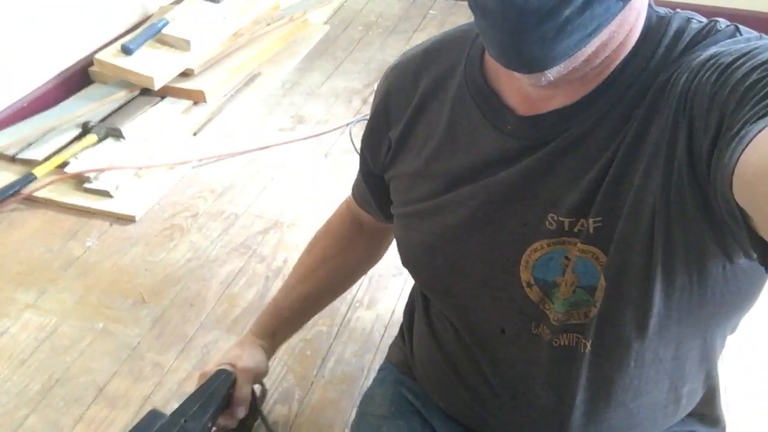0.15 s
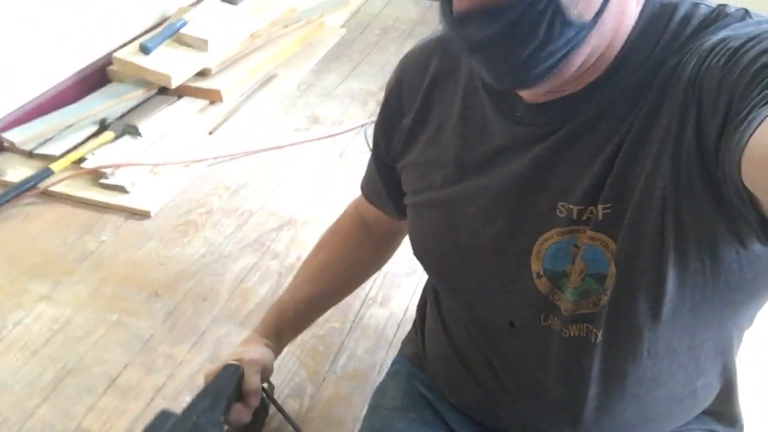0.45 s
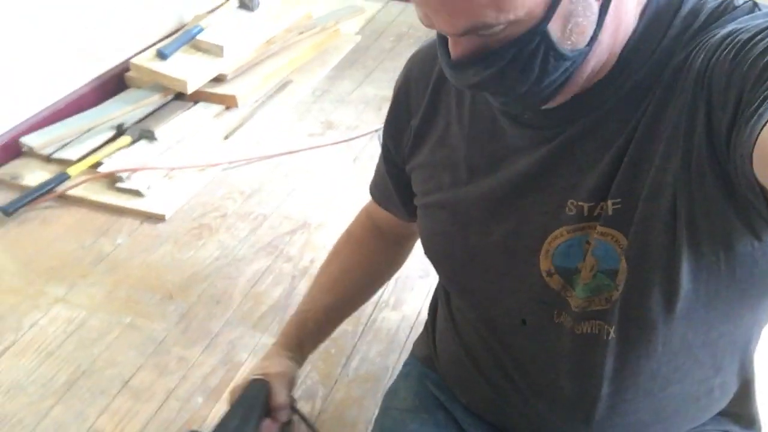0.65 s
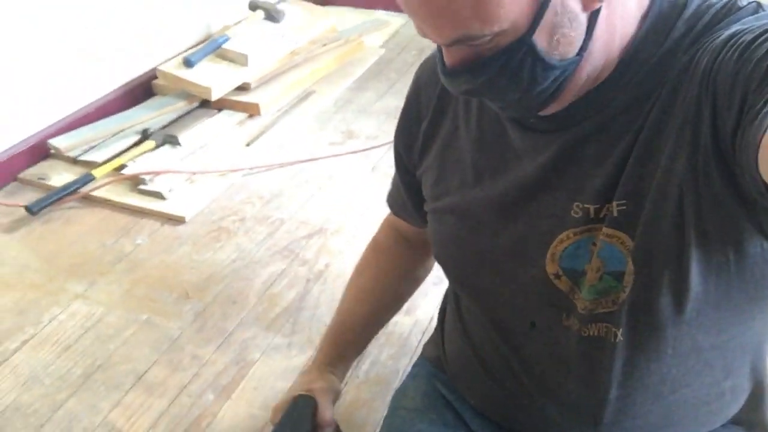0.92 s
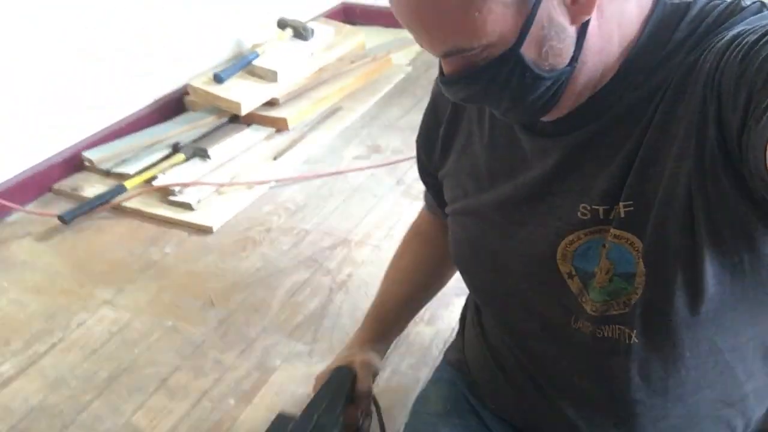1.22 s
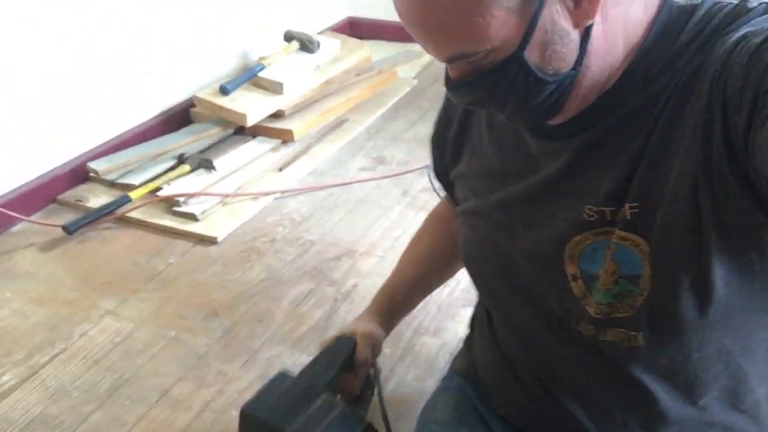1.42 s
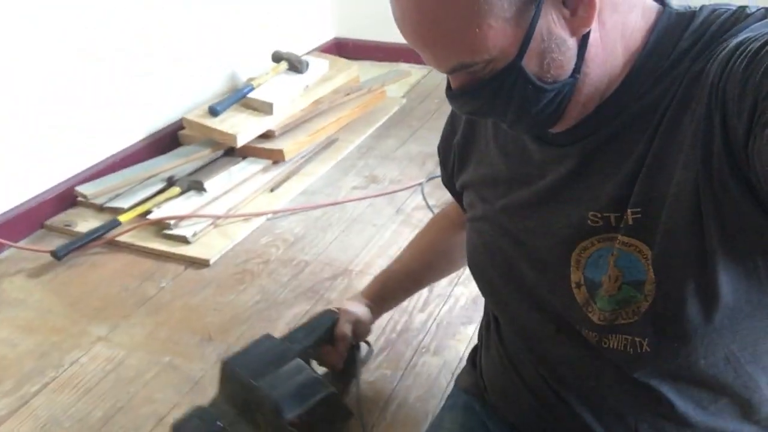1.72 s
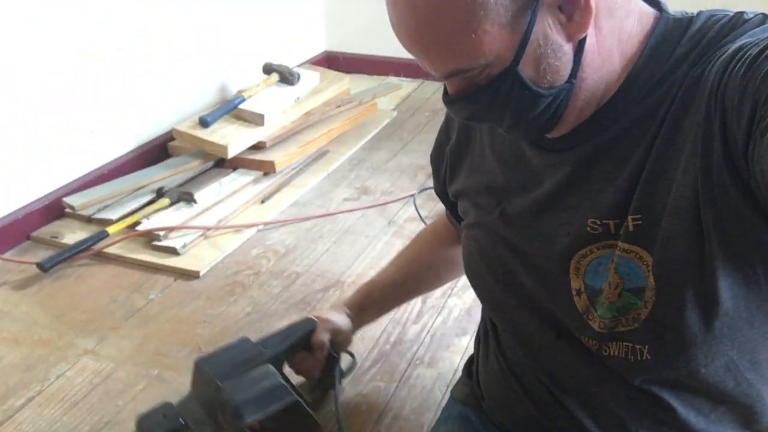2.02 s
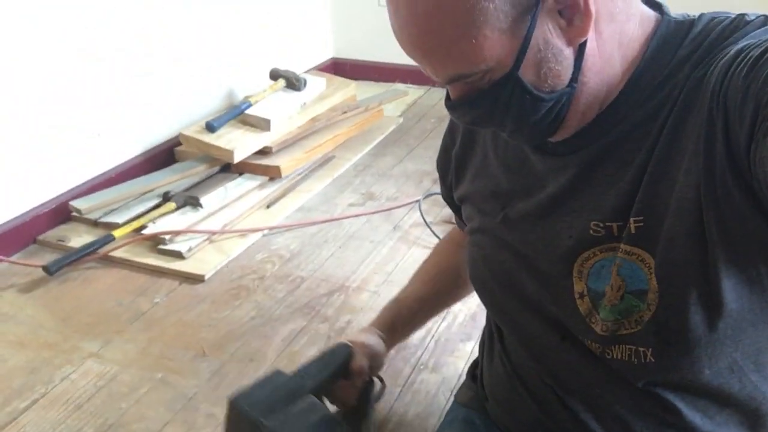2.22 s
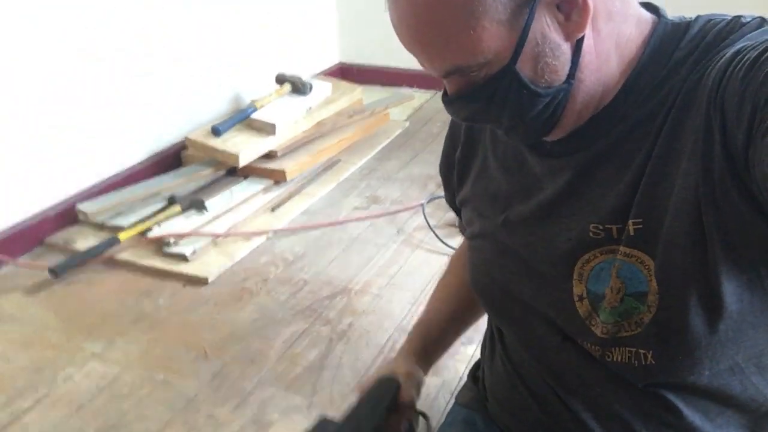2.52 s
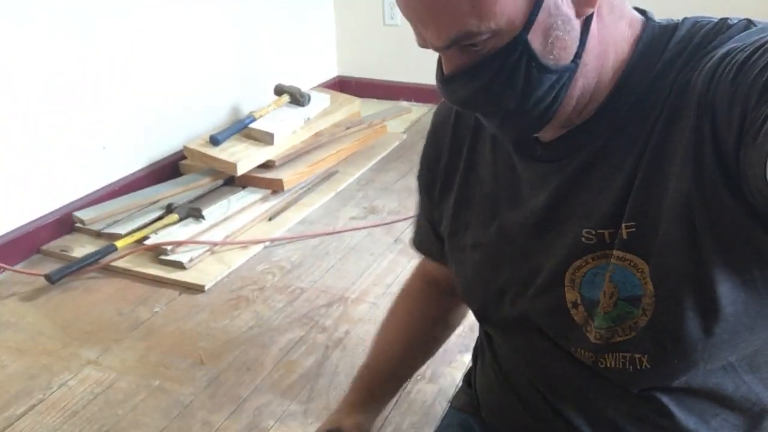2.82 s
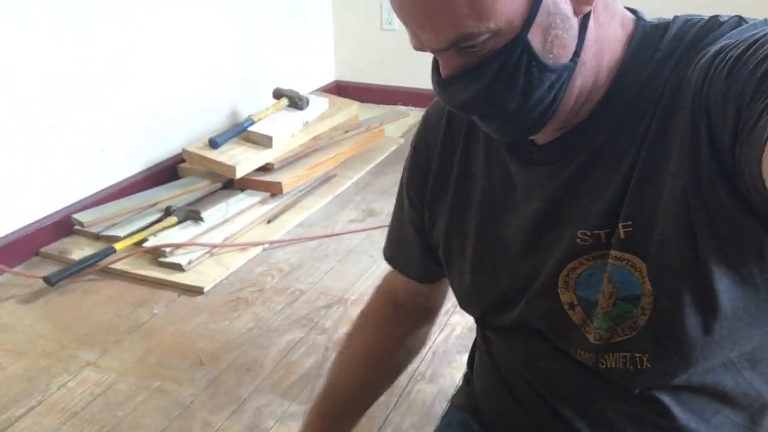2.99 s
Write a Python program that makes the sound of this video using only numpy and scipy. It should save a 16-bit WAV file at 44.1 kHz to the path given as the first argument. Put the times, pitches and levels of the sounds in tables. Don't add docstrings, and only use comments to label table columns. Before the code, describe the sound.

A handheld electric belt sander clicks on and spins up to a steady, high whine indoors.

```python
import sys
import numpy as np
from scipy import signal
from scipy.fft import rfft, irfft, next_fast_len
from scipy.io import wavfile
from scipy.ndimage import uniform_filter1d, map_coordinates

SR = 44100
rng = np.random.default_rng(int(sys.argv[2]) if len(sys.argv) > 2 else 0)


def output_pcm(signal):
    pcm = np.clip(np.atleast_2d(signal).T, -1, 1) * 32767
    wavfile.write(sys.argv[1], SR, np.round(pcm).astype(np.int16))


def gain_from_decibels(decibels):
    exponent = np.asarray(decibels, float) / 20
    return 10 ** exponent


N = 138915

# f/Hz, density/dB per Hz
QUIET = [(15, -44), (25, -9), (65, 4), (249, 11), (377, -5), (475, -34), (1730, -13), (12000, -23),
         (15600, -72), (22000, -120)]
QUIET_DB = -58
# f/Hz, density/dB per Hz
GRIP = [(200, -7), (600, -8), (1300, -4), (3000, -14), (6000, -30), (12000, -42)]
# t/s, level/dB
HAND = [
    (0, -53),
    (.05, -56.5),
    (.11, -57),
    (.13, -49.5),
    (.18, -44),
    (.21, -43.5),
]
ROOM_T60_S, ROOM_DB, ROOM_DULL_HZ = 0.57, -10, 5400

# f/Hz, density/dB per Hz
RUMBLE = [(20, -9), (32, 6), (48, -19), (65, 6), (90, 2), (110, -33), (200, -60)]
RUMBLE_DB, RUMBLE_FOLLOWS = -53.5, 0.44

# t/s, peak level/dB, t60/s
CLICKS = [
    (.124, -44, .004),
    (.2085, -31, .007),
    (.212, -31, .007),
    (.2214, -16, .012),
    (.2274, -10, .01),
]
CLICK_LOW_HZ, CLICK_HIGH_HZ = 2000, 7000
# f/Hz, level/dB, t60/s
JERK = [(500, -3, .3), (960, -5, .45), (1390, 0, .12), (1850, -2, .1)]
JERK_S, JERK_DB = .221, -21
ON_S, ON_RISE_S = .2195, .003

# f/Hz, density/dB per Hz
DRIVE = [(100, -60), (125, -6), (190, -11.5), (273, -4), (650, -8.5), (1400, -5)]
CASE_HZ = [190, 300, 435, 498, 1095, 1700]
# width/Hz, level/dB
CASE = [(35, -6), (29.8, -8), (15.7, 0), (25, -7.5), (149, -1), (275, -2)]
DRIVE_DB, CASE_DB = 1.5, 1
# t/s, air level/dB, drive level/dB
SWING = [(0.24, -32, -25.5), (0.3, -26, -30.5), (0.61, -27, -33), (0.75, -27.5, -34), (0.94, -29, -35),
         (0.97, -27, -34.5), (1.12, -32, -40), (1.37, -33, -40), (1.5, -38, -43.5), (2.1, -30.5, -44),
         (2.14, -31.5, -40), (2.63, -35, -40), (2.79, -32.5, -39.5), (3.15, -32.5, -36)]

# f/Hz, density/dB per Hz
AIR = [(15, -60), (25, -50), (670, -28.5), (1090, -11.5), (1500, -16.5), (2510, -1.5), (3120, -10),
       (7180, -17), (15700, -23)]
AIR_DB, AIR_PATCHY_DB, SPARK_DB = 7.5, 1.5, 1.5
FLOW_S = 0.016
VENT_ORDER, VENT_SHARE = 11.85, .075

# t/s, f/Hz
SPEED = [(.3, 2545), (.55, 2520), (.75, 2555), (1.08, 2545), (1.2, 2510), (1.4, 2480), (1.7, 2484),
         (2.1, 2493), (2.27, 2445), (2.4, 2430), (2.52, 2438), (2.62, 2462), (2.85, 2470), (3.15, 2480)]
SPIN_FROM_S, SPIN_S = .216, .125
BLADES = 8
# t/s, level/dB
WHINE = [(.24, -42), (.3, -23.5), (.38, -12), (.5, -15.5), (.66, -22), (.76, -15), (.93, -23), (1.09, -12),
         (1.18, -24), (1.45, -13.5), (1.55, -26.5), (1.77, -17.5), (2.01, -36), (2.12, -18), (2.33, -24.5),
         (2.43, -18.5), (2.62, -23), (3.15, -19)]
# t/s, doubled blade tone level/dB,
# tone one order under the blades level/dB, outlet whistle level/dB
FACING = [(.24, -44, -53, -53), (.305, -12, -23, -38), (.33, -40, -47, -32), (.44, -19, -22.5, -40),
          (.55, -29, -31, -29), (.68, -41, -30, -27), (.9, -37, -45, -32), (1.09, -38, -33, -34),
          (1.2, -53, -39, -32.5), (1.6, -45, -36.5, -35.5), (1.9, -37, -32, -50), (2.1, -33.5, -32, -53),
          (2.4, -43, -35, -32), (2.7, -37, -39.5, -33), (2.95, -43, -45, -32), (3.12, -32.5, -35, -35)]
ORDERS_HEARD = [7, 8, 9, 12, 15, 16, 17, 20, 23, 24, 32, 40]
TONE_DB = [1, 0, -21, -28, -25, 0, -27, -40, -33, -23, -32, -37]
HAZE_DB = [-31, -11, -35, -17, -44, -22.5, -70, -23, -37, -22.5, -19, -19]
HAZE_SHARE, JITTER = .02, 0.00135
STRAIN_DB, STRAIN_S, START_ROUGH = 8, .14, 1.5
FLUTTER, FLUTTER_PER_S = .42, 70
FADE_DB, FADE_PER_S = 0.57, 25
OWN_FADE_DB, OWN_FADE_PER_S = 3.5, 9

# f/Hz, level/dB
MIC = [(20, -1.5), (7400, 1.5), (7800, -4), (10100, -4.5), (10500, -9), (11300, -3), (15000, -9.5)]
CEILING, TOP_HZ = .8, 15720


def unit(x):
    return x / np.sqrt(np.mean(x ** 2) + 1e-20)


def curves(rows):
    s, *cols = np.transpose(rows)
    return [np.interp(np.arange(N) / SR, s, c) for c in cols]


def since(s):
    return np.maximum(np.arange(N) / SR - s, 0)


def rise(start_s, time_s):
    return 1 - np.exp(-since(start_s) / time_s)


def wobble(rate):
    at = np.cumsum(np.abs(rate) * np.ones(N)) / SR
    return map_coordinates(rng.standard_normal(4000), [at % 3990])


def haze(width_hz, phase):
    return wobble(width_hz) * np.sin(phase) + wobble(width_hz) * np.cos(phase)


def filtered(x, response):
    m = next_fast_len(N + SR // 2)
    return irfft(rfft(x, m) * response(np.fft.rfftfreq(m, 1 / SR)), m)[:N]


def rush(points, patchy_db):
    z = signal.stft(rng.standard_normal(N), nperseg=512)[2]
    field = uniform_filter1d(rng.standard_normal(z.shape), 6, 0)
    field = uniform_filter1d(field, 14, 1)
    x = signal.istft(z * gain_from_decibels(patchy_db * unit(field)), nperseg=512)[1][:N]
    f, db = np.transpose(points)
    return unit(filtered(x, lambda hz: gain_from_decibels(np.interp(np.log(hz + 1), np.log(f + 1), db))))


def quiet():
    return gain_from_decibels(QUIET_DB) * rush(QUIET, 0.33)


def room(x):
    t = since(0)
    tail = rng.standard_normal(N) * gain_from_decibels(-60 * t / ROOM_T60_S) * (t > .004)
    tail = filtered(tail, lambda hz: 1 / (1 + 1j * hz / ROOM_DULL_HZ))
    return signal.fftconvolve(x, tail / np.linalg.norm(tail))[:N]


def hand():
    hand_db, = curves(HAND)
    return gain_from_decibels(hand_db + 1.6 * wobble(113.5) - 60 * since(ON_S)) * rush(GRIP, 2.1)


def boards():
    drive_db = curves(SWING)[1]
    level_db = RUMBLE_DB + RUMBLE_FOLLOWS * (drive_db - drive_db.mean())
    return gain_from_decibels(level_db) * rise(ON_S, SPIN_S) * rush(RUMBLE, .3)


def trigger():
    out = np.zeros(N)
    for s, db, t60 in CLICKS:
        t = since(s)
        out += (t > 0) * gain_from_decibels(db - 60 * t / t60) * rng.standard_normal(N)
    out = filtered(out, lambda hz: 1j * hz / (CLICK_LOW_HZ + 1j * hz) / (1 + 1j * hz / CLICK_HIGH_HZ))
    t = since(JERK_S)
    for hz, db, t60 in JERK:
        out += gain_from_decibels(JERK_DB + db - 60 * t / t60 + 6.5 * wobble(86)) * np.sin(2 * np.pi * hz * t)
    return out


def case(hz):
    total = 0
    for k, (centre, (width, db)) in enumerate(zip(CASE_HZ, CASE)):
        damping = 1j * hz * width
        total = total + (-1) ** k * gain_from_decibels(db) * damping / (centre * centre - hz * hz + damping)
    return total


def drive():
    gears = rush(DRIVE + [(3000, -23), (20000, -60)], 1.1)
    ringing = gain_from_decibels(CASE_DB) * unit(filtered(rng.standard_normal(N), case))
    level_db = DRIVE_DB + curves(SWING)[1] + 0.41 * wobble(3.91) + 1.8 * wobble(28.94)
    return gain_from_decibels(level_db) * (gears + ringing)


def shaft():
    return curves(SPEED)[0] * rise(SPIN_FROM_S, SPIN_S) / BLADES


def air():
    vent_hz = VENT_ORDER * shaft()
    vent = haze(VENT_SHARE * vent_hz, 2 * np.pi * np.cumsum(vent_hz) / SR)
    vent_db = curves(FACING)[2] + 2.9 * wobble(20)
    flow = rise(ON_S, FLOW_S) * rush(AIR, AIR_PATCHY_DB)
    flow_db = curves(SWING)[0] + AIR_DB + SPARK_DB * wobble(600) + 0.32 * wobble(14)
    return gain_from_decibels(flow_db) * flow + gain_from_decibels(vent_db) * vent


def fan():
    shaft_hz = shaft()
    turns = np.cumsum(shaft_hz * (1 + JITTER * wobble(40.13))) / SR
    whine_db, = curves(WHINE)
    double_db, under_db, _ = curves(FACING)
    steady_db = uniform_filter1d(whine_db, size=SR // 2)
    strain = np.exp(-since(ON_S) / STRAIN_S)
    steered = {BLADES: whine_db, 2 * BLADES: double_db, BLADES - 1: under_db}
    out = np.zeros(N)
    for order, tone_db, haze_db in zip(ORDERS_HEARD, TONE_DB, HAZE_DB):
        phase = 2 * np.pi * (order * turns + rng.random())
        level_db = steady_db + OWN_FADE_DB * wobble(OWN_FADE_PER_S)
        if order % BLADES == 0:
            level_db = level_db + STRAIN_DB * strain * order / BLADES
        level_db = steered.get(order, level_db) + FADE_DB * wobble(FADE_PER_S)
        depth = (FLUTTER if order >= BLADES else FLUTTER / 2) * (1 + START_ROUGH * strain)
        tone = np.sin(phase) + depth * haze(FLUTTER_PER_S * np.sqrt(order / BLADES), phase)
        out += gain_from_decibels(level_db + tone_db) * np.sqrt(2) * tone
        out += gain_from_decibels(steady_db + haze_db) * haze(HAZE_SHARE * order * shaft_hz, phase)
    return out


def scene():
    running = fan() + air() + drive() + boards()
    tool = rise(ON_S, ON_RISE_S) * running + trigger()
    return (tool + gain_from_decibels(ROOM_DB) * room(tool) + hand() + quiet())[None]


def top_cut(x):
    return signal.sosfilt(signal.butter(12, 16090, fs=SR, output="sos"), x)


def record(dry):
    f, db = np.transpose(MIC)
    heard = dry[0] / (1 + np.abs(dry[0] / CEILING) ** 4) ** (1 / 4)
    heard = filtered(heard, lambda hz: gain_from_decibels(np.interp(hz, f, db)) * np.clip((TOP_HZ - hz) / 120, 0, 1))
    return top_cut(heard[None])


dry = scene()
out = record(dry)
output_pcm(out)
```